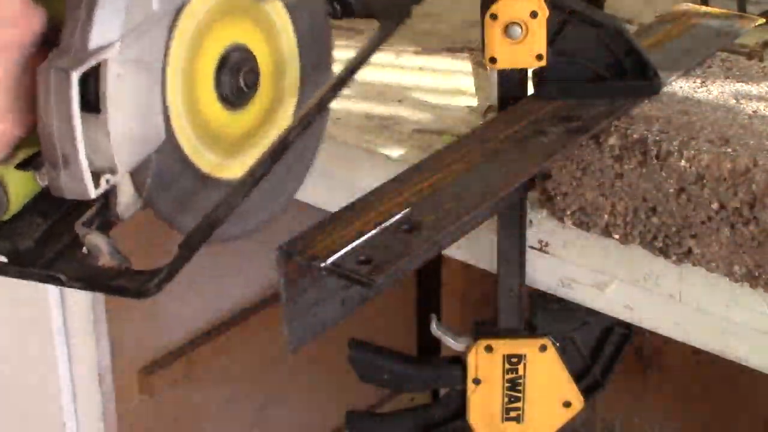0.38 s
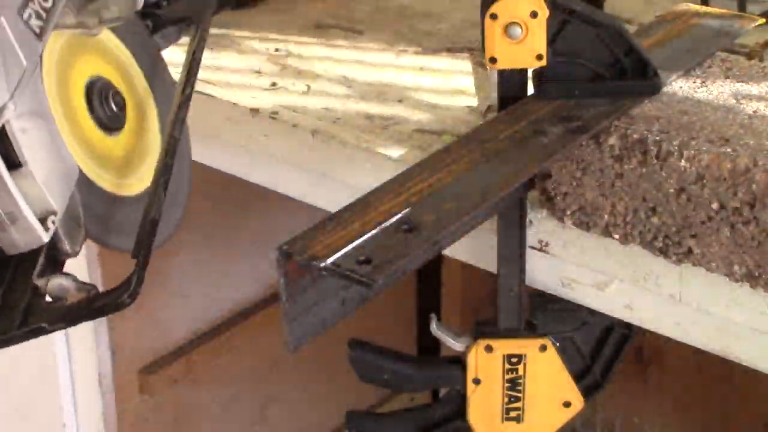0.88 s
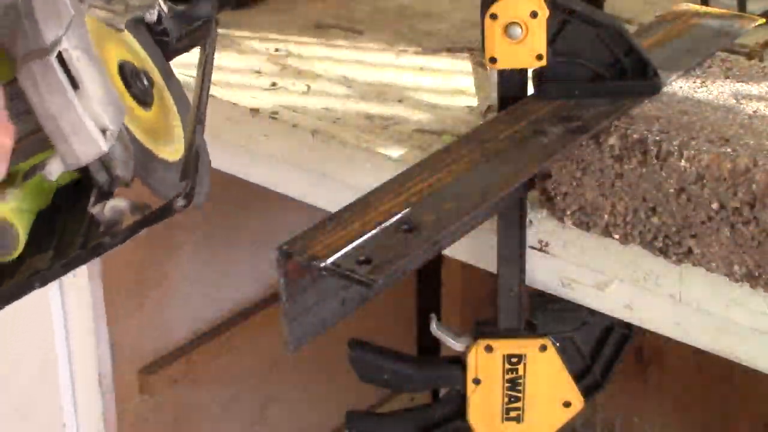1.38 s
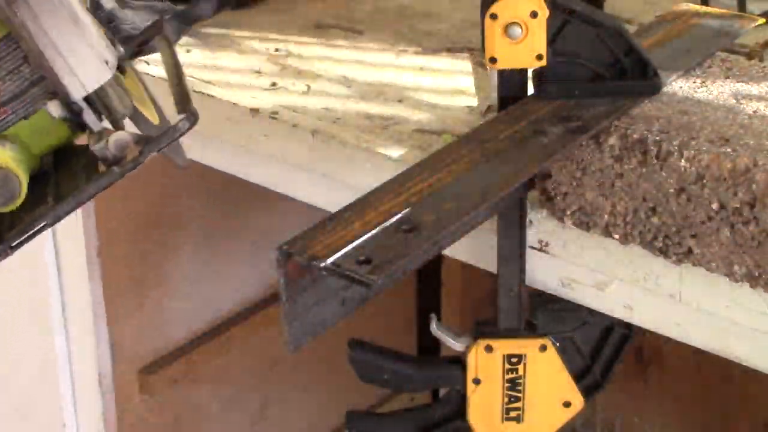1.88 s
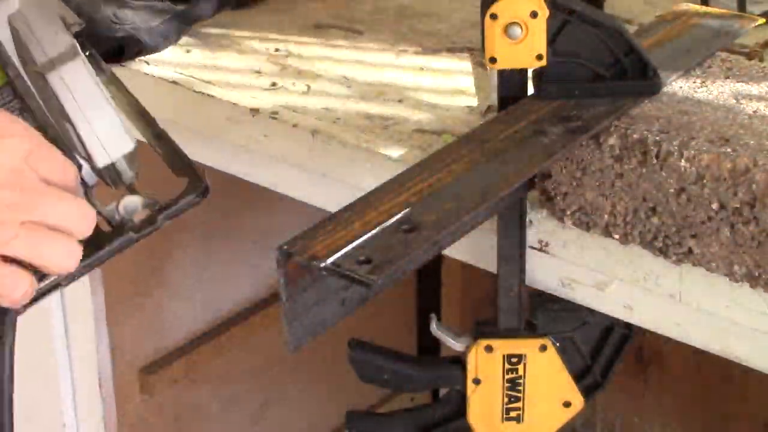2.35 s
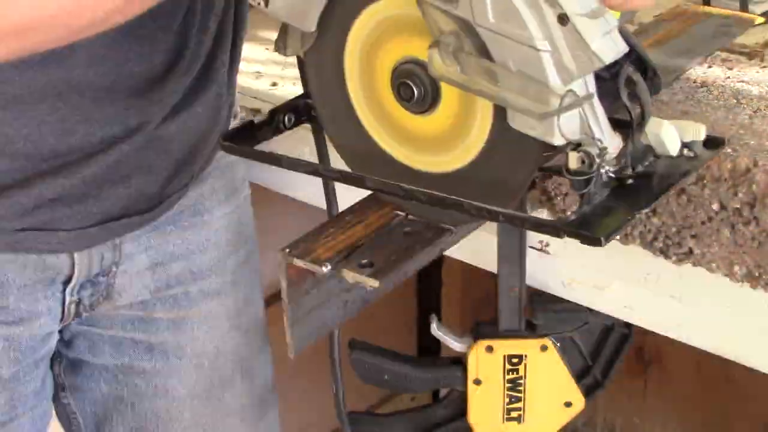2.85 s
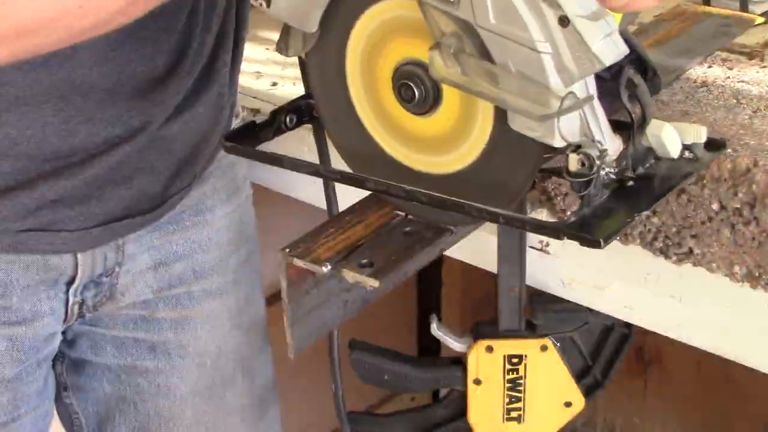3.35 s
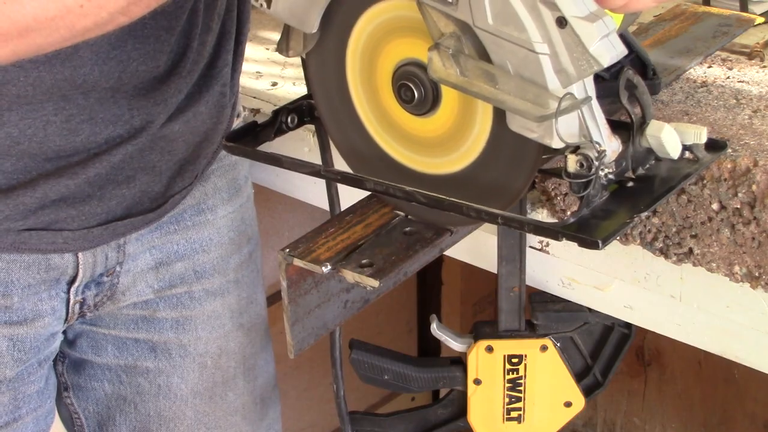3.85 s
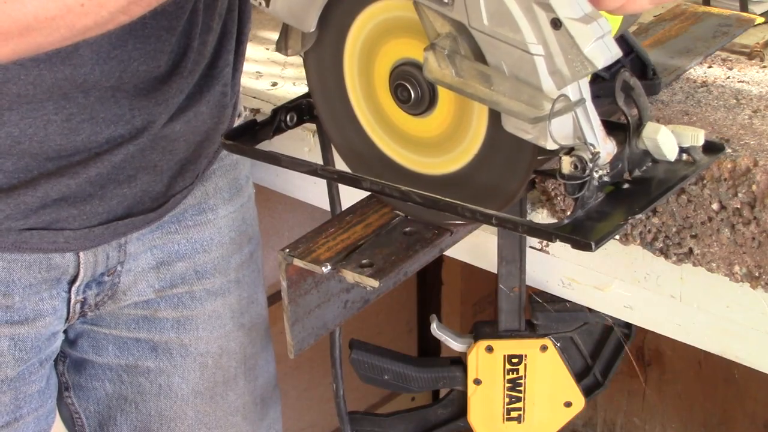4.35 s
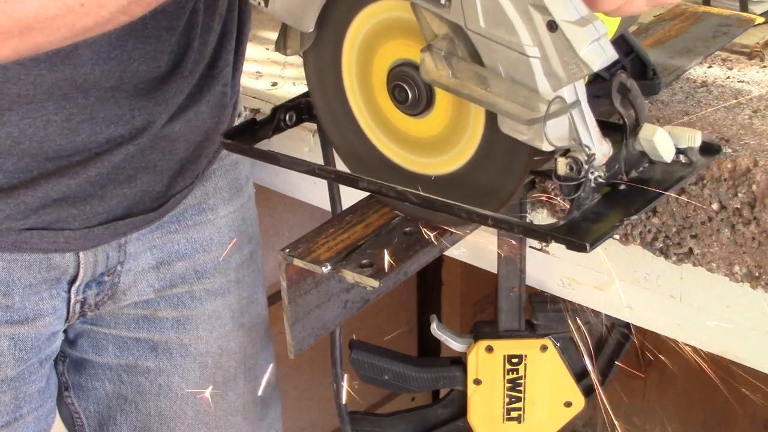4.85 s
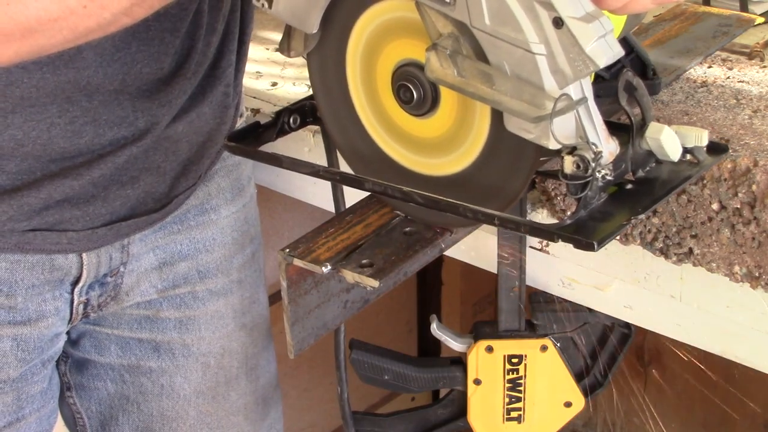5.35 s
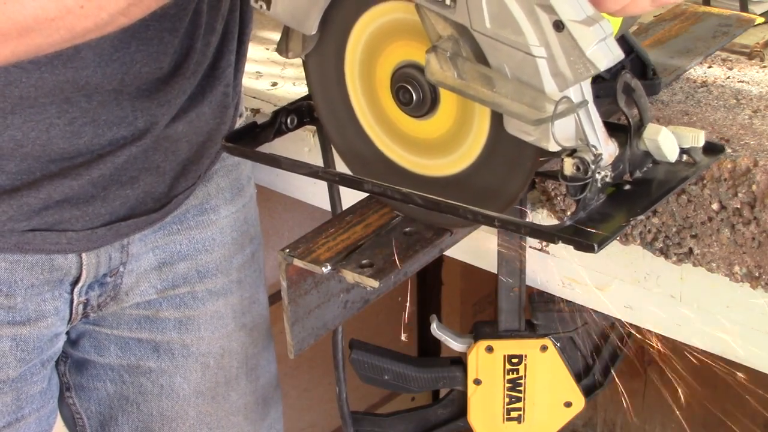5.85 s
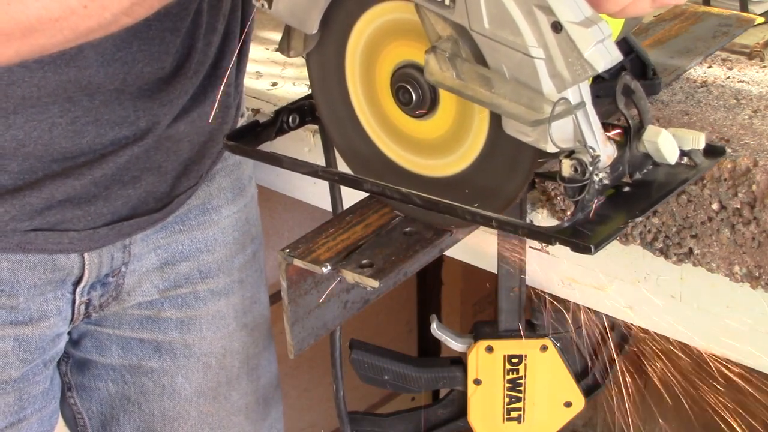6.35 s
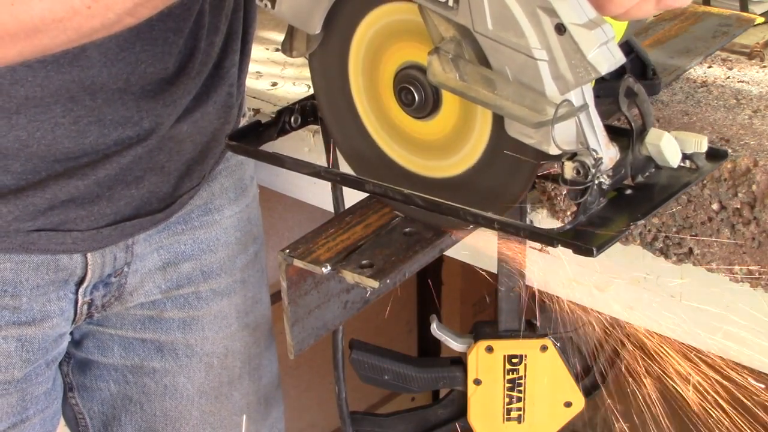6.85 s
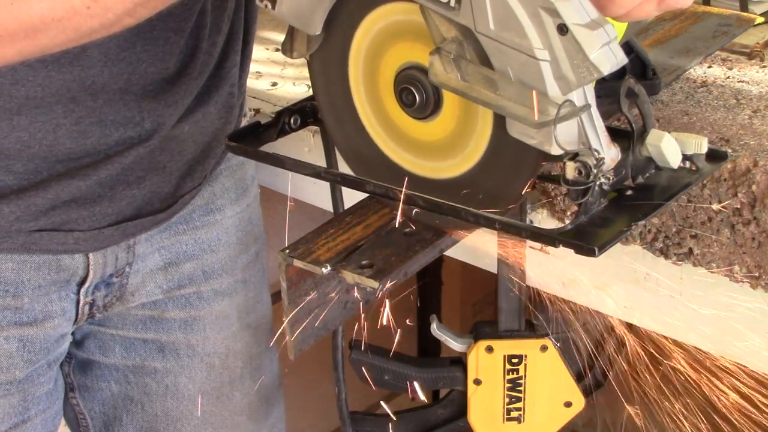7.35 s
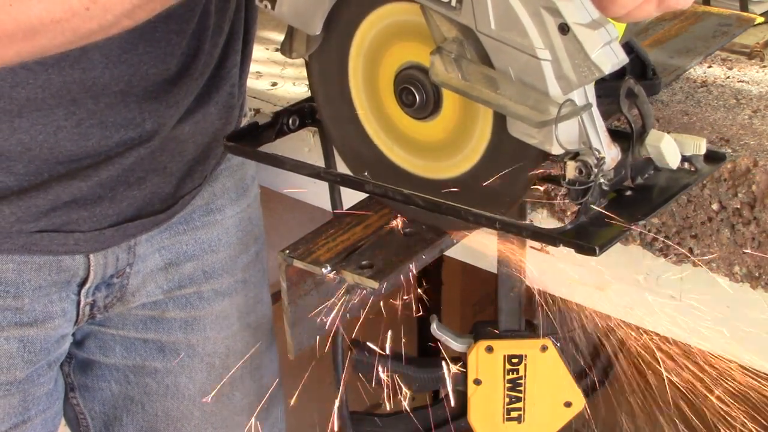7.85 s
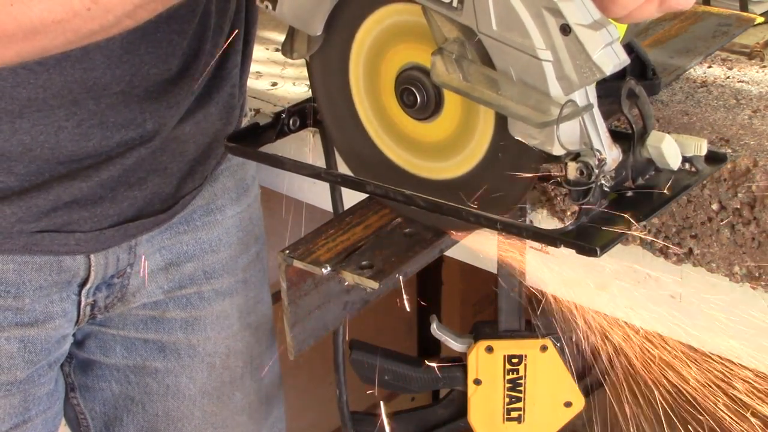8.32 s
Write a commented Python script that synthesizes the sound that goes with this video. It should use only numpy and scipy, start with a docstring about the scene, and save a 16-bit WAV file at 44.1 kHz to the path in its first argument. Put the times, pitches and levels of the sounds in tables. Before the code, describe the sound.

A circular saw leaves steel with a brief scrape, coasts down in a rattling whine, abruptly runs at full speed, then grinds into metal.

```python
"""Between walls that answer only briefly, a hand-held circular saw with an abrasive wheel works on a steel
angle. It leaves the steel and coasts down; then the scene changes: near full speed, it runs free, touches the
steel and grinds into it. Fan whine, shaft hum and gear tones follow the speed; shaped noise makes housing roar,
brush hiss and air rush. The wheel's uneven rim repeats its pattern every turn and rings the steel. Left and
right are nearly alike."""
import sys
import numpy as np
from scipy import signal
from scipy.fft import rfft, irfft, next_fast_len
from scipy.io import wavfile
from scipy.ndimage import uniform_filter1d, map_coordinates

SR = 44100
rng = np.random.default_rng(int(sys.argv[2]) if len(sys.argv) > 2 else 0)


def master_out(mix):
    """Clip the mix to full scale and print it as 16-bit PCM to the path in sys.argv[1]."""
    frames = np.transpose(np.atleast_2d(mix))
    ceiling = np.clip(frames, -1, 1)
    pcm = np.round(ceiling * 32767).astype(np.int16)
    wavfile.write(sys.argv[1], SR, pcm)


def rack_gain(trim_db):
    """Turn a fader trim in dB into the linear factor to multiply a signal by."""
    fader = np.asarray(trim_db, float)
    return 10 ** (fader / 20)


N = 373086  # length in samples

# fan blades, teeth on the small motor gear, teeth on the big wheel gear
BLADES, PINION_TEETH, GEAR_TEETH = 15, 7, 39
# resonances of the gear case: pitch_hz, width_hz, level_db
GEAR_CASE_MODES = [(820, 45, 8), (900, 45, 11), (1140, 50, 5), (1320, 55, 9), (1600, 100, 2),
                   (6400, 250, 8)]
# bands in which the levels of roar, hiss and rush are set: low_hz, high_hz
LEVEL_BANDS = [(600, 3000), (3000, 7000), (8500, 14000)]
# colour of the housing roar: pitch_hz, level_db (for each Hz of width)
HOUSING_COLOUR = [(30, -58), (60, -67), (120, -41), (240, -20), (450, -10), (560, -6.5), (640, -7.5),
                  (800, -2.5), (950, -3.5), (1300, -3.5), (1800, -5), (2600, -7.5), (3300, -7.5),
                  (6000, -41)]
# colour of the air rush: pitch_hz, level_db (for each Hz of width)
AIR_COLOUR = [(5000, -18), (7000, -2.5), (8500, -3.5), (10000, -1.5), (11500, -7), (12500, -9.5),
              (14000, -15), (15650, -19), (15800, -70)]
# colour of the brush hiss: pitch_hz, level_db (for each Hz of width)
BRUSH_COLOUR = [(1500, -35), (2600, -1.5), (3400, 0), (4200, 0), (5200, -1), (6500, -2), (7500, -3),
                (8500, -13), (10500, -37)]
# resonances of the steel angle: pitch_hz, width_hz, level_db
STEEL_MODES = [(994, 320, -2), (1287, 270, -0.5), (1690, 92, -4), (2694, 84, -3.5), (3490, 320, -2.5),
               (4676, 150, 0.5), (5710, 150, -3), (7030, 690, -2.5), (8400, 720, -5.5), (10000, 360, -1.5),
               (11400, 270, -3), (13060, 300, -10), (14950, 270, -14)]
# lobes worn into the rim: lobes_per_turn, start_s, peak_s, end_s, level_db (before the swell and waver)
RIM_LOBES = [(2, 4.0, 4.58, 4.8, -61), (25, 3.84, 4.53, 4.83, -45), (15, 3.87, 4.6, 5.68, -43),
             (19, 3.91, 4.31, 4.79, -50), (17, 3.93, 4.34, 4.78, -49), (2, 5.15, 5.35, 5.6, -68),
             (41, 5.41, 6.38, 7.09, -44), (15, 5.76, 6.04, 7.3, -42), (42, 5.77, 6.79, 7.07, -47),
             (11, 5.78, 6.12, 6.9, -44), (2, 5.79, 6.04, 6.82, -66), (6, 5.81, 6.24, 6.95, -51),
             (13, 6.1, 6.69, 7.2, -41), (13, 7.3, 7.7, 8.2, -46), (78, 5.99, 6.44, 7.57, -46),
             (39, 6.07, 6.46, 8.46, -43), (8, 6.35, 6.76, 7.3, -45), (53, 6.24, 6.95, 7.82, -42),
             (20, 6.28, 6.74, 7.41, -48), (7, 6.32, 8.46, 8.46, -50), (14, 6.39, 6.98, 7.3, -39),
             (40, 6.52, 7.33, 8.46, -41), (82, 6.88, 7.32, 7.65, -47), (11, 7.4, 7.9, 8.8, -43),
             (12, 7.35, 7.82, 8.6, -41), (4, 7.3, 7.89, 8.46, -59), (54, 6.63, 6.89, 7.34, -51),
             (54, 7.4, 7.77, 8.46, -49), (41, 7.28, 7.54, 8.11, -49), (16, 6.2, 6.55, 6.8, -50),
             (14, 7.4, 7.68, 8.2, -42)]
# strength of the echo that differs left to right: pitch_hz, side_minus_mid_db
STEREO_WIDTH = [(60, -10), (200, -24), (500, -28), (1000, -34), (2000, -29), (3500, -24.5), (6000, -18.5),
                (8500, -20.5), (12000, -24.5)]
# trigger let go (s), speed then before the load (turns/s), friction (turns/s2), fan drag (1/turn)
RELEASE_S, RELEASE_TURNS, FRICTION, DRAG = .19, 493.3, 81.4, .0012576
# scene change (s), free speed and what is missing from it then (turns/s), time constant of the run-up (s)
SCENE_CHANGE_S, FREE_TURNS, SHORTFALL, RUN_UP_S = 2.439, 504.6, 57.2, .267
# how much the cut brakes the motor: time_s, speed_lost_turns_per_s
CUTTING_LOAD = [(0, 5), (.11, .7), (.19, 0), (3.8, .2), (4.6, 1.2), (4.75, 2.9), (4.9, 6.6), (5.1, 3.8),
                (5.4, 1.6), (5.85, .6), (6.05, 3.3), (6.6, 11.3), (7.2, 21.6), (7.8, 28.9), (8.1, 34.8),
                (8.46, 32.6)]
# fan whine: dB at full speed, dB lost coasting at half speed, dB lost at the heaviest load
BLADE_DB, BLADE_COAST_DB, BLADE_LOAD_DB = -34.5, 28, 3.5
# its octave: dB when settled, extra dB at the scene change, fading time (s), size of random waver (dB)
OCTAVE_DB, OCTAVE_START_DB, OCTAVE_FADE_S, OCTAVE_WAVER_DB = -60, 12, 1.5, 3.5
OCTAVE_RELEASE_DB, OCTAVE_COAST_DB = 2.5, 9  # extra dB up to the scene change, dB lost coasting at half speed
# the whine swells and drops out: time_s, change_db, half_width_s
WHINE_WAVERS = [(.07, -9.5, .04), (.5, -2, 0.045), (2.8, 8, .12), (2.97, -4, 0.079), (3.54, -10, 0.089),
                (4.06, -4, .05), (4.53, -11, 0.094), (4.72, 2, .06), (5.1, 2.5, .12), (5.56, -13, .04),
                (5.4, -1.5, .1), (5.8, -1, 0.084), (6.41, -15, 0.097), (6.8, 5, .08), (7.02, -3, 0.076),
                (7.76, -12, 0.052), (7.95, -6, 0.057), (8.16, -5, 0.046), (8.42, -4, .07)]
# shaft tones: multiple_of_shaft, free_running_db, lost_at_heaviest_load_db, coasting_start_db
SHAFT_HUMS = [(1, -48, 24, -51.5), (1.71, -50, 40, -62), (2.6, -42, 28, -62), (5, -44.5, 14, -64),
              (10, -48.5, 40, -64)]
HUM_COAST_DB, HUM_RUN_UP_DB = 15, 17  # dB lost coasting at half speed, and at the scene change
# loose gears, levels before the gear case: time_s, mesh_tone_db, overtone_clatter_db,
# knock_share (0-1, the part of the clatter that comes as one knock a wheel turn)
GEAR_PLAY = [(0, -48, -61, .9), (.3, -40, -48, 0.9), (.55, -44, -42.5, 0.9), (.75, -42, -50.5, 0.8),
             (1.03, -40, -48.5, 1), (1.07, -44, -39.5, 0.15), (1.6, -39, -40.5, 0.34),
             (2.05, -36, -39.5, .15), (2.3, -43, -43, .25), (2.43, -45, -39, 0.1), (2.45, -33, -38, 0.7),
             (2.62, -33.5, -37, 0.5), (2.85, -40, -47, .6), (3.2, -40, -46, .58), (5, -40.5, -59, .55),
             (6, -42.5, -50, .54), (8.46, -39.5, -46, .5)]
# overtones 2 to 7 of the mesh tone, in order: level_over_clatter_db
GEAR_OVERTONES_DB = [-2.5, 2.5, -0.5, -5, -7, -9.5]
# how strong an overtone is at the pitch it has reached: pitch_hz, level_db
CLATTER_BY_PITCH = [(1500, 2), (2500, -0.5), (3500, -3), (5000, -1), (6400, 2.5), (8000, 2.5), (9200, -2),
                    (10500, -3), (12000, -12), (16000, -25)]
# common level of roar, hiss and rush: time_s, level_db
RUNNING_LEVEL = [(.06, -41), (.3, -39), (1.02, -36), (1.1, -35.5), (1.8, -36.5), (2.3, -37.5), (2.435, -34),
                 (2.445, -33.5), (2.6, -33), (2.8, -35.5), (3.8, -35.5), (4.2, -34.5), (4.9, -36.5),
                 (5.5, -36.5), (5.8, -36.5), (6.9, -40), (8.46, -37)]
# rows for roar, hiss, rush: full_speed_over_running_level_db, change_down_to_standstill_db
NOISE_LAYERS = [(-.5, 0.5), (.5, -7), (-5, -7)]
# steady pressure of wheel on steel: time_s, grinding_db
WHEEL_PRESSURE = [(3.3, -80), (3.6, -39.5), (4.4, -40), (4.68, -34.5), (4.92, -35.5), (5.1, -50),
                  (5.55, -42.5), (5.84, -39), (5.9, -32.5), (6.6, -32), (7.2, -34), (7.8, -33),
                  (8.46, -35.5)]
# moments when the wheel snags: start_s, held_s, level_db
WHEEL_SNAGS = [(0.005, 0.021, -37.5), (4.73, 0.12, -31), (5.715, 0.0173, -35), (5.851, 0.027, -31)]
SNAG_RISE_S, SNAG_FALL_DB_PER_S = 0.01, 250
STEADY_BURST, SNAG_BURST = 0.32, .75  # share of the grinding that comes in one burst a turn, 0-1
# fainter chance lobes: how many, lobes a turn (least, most), start (first s, last s), life (s)
FAINT_COUNT, FAINT_LOBES, FAINT_START_S, FAINT_LIFE_S = 24, (21, 96), (5.7, 7.8), .9
FAINT_DB, FAINT_SCATTER_DB = -53, 2.5  # middle level and greatest step from it, before the swell and waver


def unit(x):
    """Scales a signal to rms 1."""
    return x / np.sqrt(np.mean(x ** 2) + 1e-20)


def along(points, hz):
    """Reads a curve of (Hz, value) points on a log pitch axis."""
    f, v = np.transpose(points)
    return np.interp(np.log(hz + 1), np.log(f + 1), v)


def curves(rows):
    """Draws one value per sample for each column after the time."""
    s, *cols = np.transpose(rows)
    return [np.interp(np.arange(N) / SR, s, c) for c in cols]


def wobble(rate):
    """A smooth random curve with rate new random points a second."""
    steps = np.arange(0, N + 16, 16)
    points = rng.standard_normal(int(N * rate / SR) + 4)
    smooth = map_coordinates(points, [steps * rate / SR])
    return np.interp(np.arange(N), steps, smooth)


def filtered(x, response):
    """Filters x by a complex response given as a function of frequency."""
    m = next_fast_len(N + 8192)
    return irfft(rfft(x, m) * response(np.fft.rfftfreq(m, 1 / SR)), m)[..., :N]


def resonances(modes, floor):
    """Response of an object that rings at its (Hz, width Hz, dB) modes, over a flat floor."""
    def response(f):
        total = floor
        for k, (centre, width, db) in enumerate(modes):
            detuning = (f - centre * centre / (f + 1e-9)) / width
            total = total + (-1) ** k * rack_gain(db) / (1 + 1j * detuning)
        return total
    return response


def tone(turns, fuzz, rate):
    """One cycle per turn, rms about 1; the share fuzz (0-1) wavers at random, rate points a second."""
    fuzz = np.clip(fuzz, 0, 1)
    swing = np.sqrt(1 - fuzz) + np.sqrt(fuzz / 2) * (wobble(rate) + 1j * wobble(rate))
    return np.sqrt(2) * np.real(swing * np.exp(2j * np.pi * turns))


def rush(spectrum, lo, hi, patchy_db):
    """Coloured noise, uneven over time and pitch, scaled so that its band lo-hi has rms 1."""
    z = signal.stft(rng.standard_normal(N), nperseg=512)[2]
    field = uniform_filter1d(rng.standard_normal(z.shape), size=5, axis=0)
    field = uniform_filter1d(field, size=8, axis=1)
    noise = signal.istft(z * rack_gain(patchy_db * unit(field)), nperseg=512)[1][:N]
    noise = filtered(noise, lambda hz: rack_gain(along(spectrum, hz)))
    hz, power = signal.welch(noise, SR, nperseg=1024, noverlap=0)
    return noise / np.sqrt(hz[1] * power[(hz > lo) & (hz < hi)].sum())


def bursts(turns, fall, scatter_db):
    """Envelope of rms 1: a quick rise once a turn, of a new size each time, dying over the share fall of the turn."""
    size = rack_gain(scatter_db * rng.standard_normal(int(turns[-1]) + 1))
    age = turns % 1 / fall
    return unit(size[turns.astype(int)] * (np.exp(-age) - np.exp(-4 * age)))


def speed():
    """Turns a second: coasting against friction and fan drag; after the scene change, running up to free speed,
    less the load."""
    t = np.arange(N) / SR
    knee = np.sqrt(FRICTION / DRAG)  # the speed at which fan drag equals friction
    coasting_s = np.clip(t - RELEASE_S, 0, SCENE_CHANGE_S)
    coast = knee * np.tan(np.arctan(RELEASE_TURNS / knee) - knee * DRAG * coasting_s)
    run_up = FREE_TURNS - SHORTFALL * np.exp((SCENE_CHANGE_S - np.maximum(t, SCENE_CHANGE_S)) / RUN_UP_S)
    return np.where(t < SCENE_CHANGE_S, coast, run_up) - curves(CUTTING_LOAD)[0]


def walls(x):
    """A short diffuse echo, made from fading noise, for the difference between left and right."""
    tail = rng.standard_normal(SR // 8) * rack_gain(-60 * np.arange(SR // 8) / SR / 0.052)  # 60 dB down in 0.052 s
    echo = signal.fftconvolve(x, tail / np.linalg.norm(tail))[:N]
    return filtered(echo, lambda hz: rack_gain(along(STEREO_WIDTH, hz)))


def running_noise(wheel, turns):
    """The housing roars, the brushes hiss; the air rush dulls as the fan slows, and a rattle ticks in it once a turn."""
    slow = 1 - turns / FREE_TURNS
    running_db = curves(RUNNING_LEVEL)[0]
    roar_db, hiss_db, air_db = (running_db + db + change_db * slow for db, change_db in NOISE_LAYERS)
    roar = rack_gain(roar_db + 0.14 * wobble(12)) * rush(HOUSING_COLOUR, *LEVEL_BANDS[0], patchy_db=1.5)
    hiss = rack_gain(hiss_db + 0.36 * wobble(19)) * rush(BRUSH_COLOUR, *LEVEL_BANDS[1], patchy_db=0.57)
    air = rush(AIR_COLOUR, *LEVEL_BANDS[2], patchy_db=0.3)
    dull = filtered(air, lambda hz: 1 / (1 + (hz / 11500) ** 6))
    air = air + np.clip(1.4 * slow, 0, 1) * (dull - air)
    knock_share = curves(GEAR_PLAY)[2]
    tick = np.clip(0.13 + 1.3 * slow * knock_share, 0, 1)
    rattle = bursts(wheel + .6, .2, scatter_db=3)
    air = rack_gain(air_db + 0.66 * wobble(30)) * air * (1 - tick + tick * rattle)
    return roar + hiss + air


def gears(shaft, wheel, turns):
    """Loose teeth clatter in smeared overtones of the mesh; the gear case picks out what passes its modes."""
    mesh_db, clatter_db, share = curves(GEAR_PLAY)
    share = np.clip(share, 0, 1)
    # one bad place on the big gear knocks; the pinion runs out of true and splits every line
    knock = 1 - share + share * bursts(wheel + .6, .13, scatter_db=2.5)
    beat = unit(1 + .75 * np.cos(2 * np.pi * shaft))
    mesh = rack_gain(mesh_db + 2 * wobble(30)) * tone(PINION_TEETH * shaft, .95, 220)
    clatter = np.zeros(N)
    for k, overtone_db in enumerate(GEAR_OVERTONES_DB, start=2):
        pitch_db = along(CLATTER_BY_PITCH, k * PINION_TEETH * turns)
        level_db = clatter_db + overtone_db + pitch_db + 1.34 * wobble(6.83)
        clatter += rack_gain(level_db) * tone(k * PINION_TEETH * shaft, .8, 130 + 35 * k)
    case = resonances(GEAR_CASE_MODES, 0.8)
    return filtered(beat * (mesh + knock * clatter), lambda hz: case(hz) / (1 + (hz / 11500) ** 6))


def motor_tones(shaft, turns):
    """Fan blades whine cleanly; shaft unbalance and bearings hum in tones below."""
    t, load = np.arange(N) / SR, curves(CUTTING_LOAD)[0]
    first = t < SCENE_CHANGE_S
    short = FREE_TURNS - load - turns  # speed missing for reasons other than the load
    coast = first * (2 * short / FREE_TURNS) ** 2  # 1 at half speed
    load = load / load.max()
    blade_db = BLADE_DB - BLADE_COAST_DB * coast - BLADE_LOAD_DB * load
    for s, db, width in WHINE_WAVERS:
        blade_db += db * np.exp(-((t - s) / width) ** 2)
    octave_db = OCTAVE_DB + OCTAVE_WAVER_DB * wobble(8) - OCTAVE_COAST_DB * coast
    start_db = OCTAVE_START_DB * np.exp(-np.abs(t - SCENE_CHANGE_S) / OCTAVE_FADE_S)
    octave_db += np.where(first, OCTAVE_RELEASE_DB, start_db)
    out = rack_gain(blade_db) * tone(BLADES * shaft, 0.051, 60)
    out += rack_gain(octave_db) * tone(2 * BLADES * shaft, 0.27, 60)
    for order, free_db, load_db, coast_db in SHAFT_HUMS:
        coasting = coast_db - HUM_COAST_DB * coast
        running = free_db - load_db * load - HUM_RUN_UP_DB * short / SHORTFALL
        db = np.where(first, coasting, running)
        out += rack_gain(db + 1.2 * wobble(3)) * tone(order * shaft, 0.067, 15)
    return out


def rim_lobes(wheel):
    """Bumps worn into the rim sing at their count a turn; each swells in, peaks and wears away, wavering on its own."""
    t, out, waver = np.arange(N) / SR, np.zeros(N), wobble(11)
    a, b, c = rng.random((FAINT_COUNT, 3)).T
    counts = np.floor(np.interp(a * a, (0, 1), FAINT_LOBES))  # squaring favours low counts
    born = np.interp(b, (0, 1), FAINT_START_S)
    faint_db = FAINT_DB + FAINT_SCATTER_DB * (2 * c - 1)
    faint = zip(counts, born, born + 0.44 * FAINT_LIFE_S, born + FAINT_LIFE_S, faint_db)
    for lobes, start, peak, end, db in [*RIM_LOBES, *faint]:
        i = slice(int((start - .15) * SR), int((end + 0.2) * SR))
        turn, shift = rng.random(2)
        swell_db = np.interp(t[i], [start - .15, start, peak, end, end + .15], [-13, -10, 0.5, -8.5, -13])
        swell_db += 2 * np.roll(waver, int(shift * N))[i]
        out[i] += np.sqrt(2) * rack_gain(db + swell_db) * np.cos(2 * np.pi * (lobes * wheel[i] + turn))
    return out


def snags():
    """Gain of the sudden catches of the wheel: a quick rise, a hold, a fall."""
    t, gain = np.arange(N) / SR, np.zeros(N)
    for s, held, db in WHEEL_SNAGS:
        rise = np.clip((t - s) / SNAG_RISE_S, 0, 1)
        gain += rise * rack_gain(db - SNAG_FALL_DB_PER_S * np.clip(t - s - held, 0, 1))
    return gain


def grinding(wheel):
    """The rim's grit passes again every turn and wears slowly; fresh sparks hiss over it; both ring the steel."""
    steady, snag = rack_gain(curves(WHEEL_PRESSURE)[0]), snags()
    burst = (STEADY_BURST * steady + SNAG_BURST * snag) / (steady + snag)
    burst = np.clip(burst, 0, 1)
    cells = 400  # random heights around the rim
    rim = rng.standard_normal((int(wheel[-1] / 25) + 4, cells + 1))  # a new rim pattern every 25 turns
    grit = unit(map_coordinates(rim, [wheel / 25, wheel % 1 * cells], order=1))  # patterns blend smoothly
    scrape = 0.55 * grit + 0.88 * rng.standard_normal(N)
    scrape *= 1 - burst + burst * bursts(wheel, .3, scatter_db=3)
    ring = resonances(STEEL_MODES, 0.027)
    # the grinding carries little bass
    rung = filtered(scrape, lambda f: ring(f) * (1j * f / (450 + 1j * f)) ** 3)
    return np.hypot(steady, snag) * unit(rung)


def scene():
    """The saw and the steel under it; the steel sounds narrower."""
    turns = speed()
    shaft = np.cumsum(turns) / SR  # turns made so far
    wheel = shaft * PINION_TEETH / GEAR_TEETH + .28
    saw = running_noise(wheel, turns) + gears(shaft, wheel, turns) + motor_tones(shaft, turns)
    steel = rim_lobes(wheel) + grinding(wheel)
    side = walls(saw + rack_gain(-14.0) * steel)
    return np.array([saw + steel + side, saw + steel - side])


def top_cut(x):
    """Nothing passes above the cut-off."""
    return signal.sosfilt(signal.butter(12, 15760, fs=SR, output="sos"), x)


def record(dry):
    """The small microphone cuts the deep bass."""
    thin = filtered(dry, lambda hz: (1j * hz / (90 + 1j * hz)) ** 2)
    return top_cut(thin)


dry = scene()
out = record(dry)
master_out(out)
```